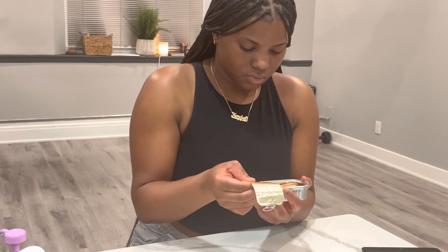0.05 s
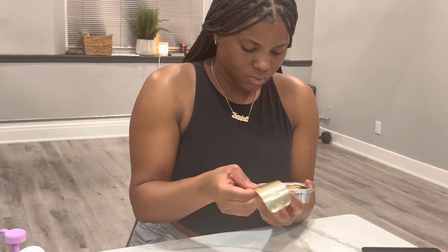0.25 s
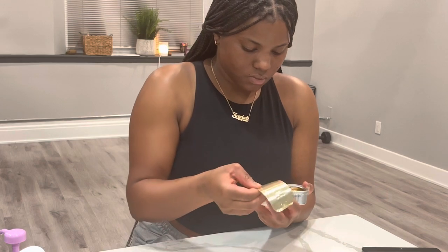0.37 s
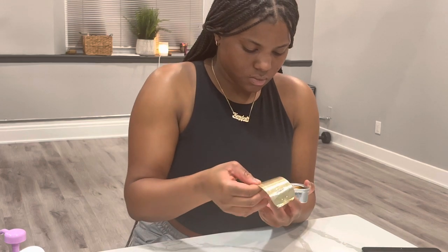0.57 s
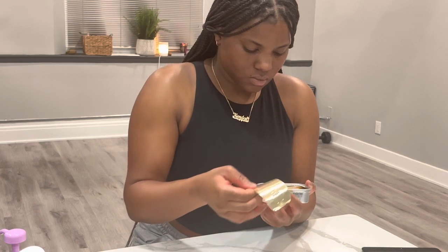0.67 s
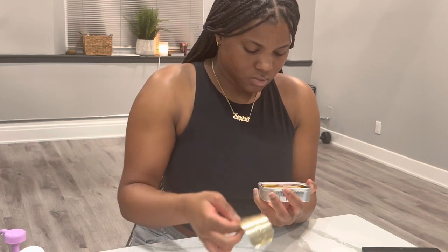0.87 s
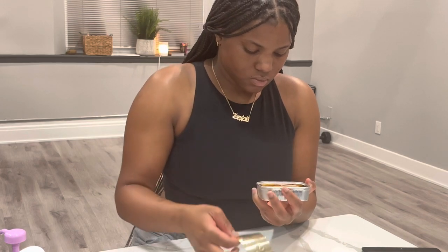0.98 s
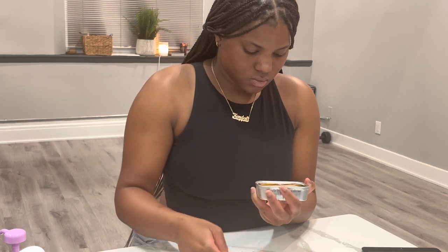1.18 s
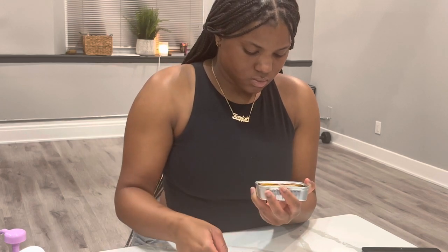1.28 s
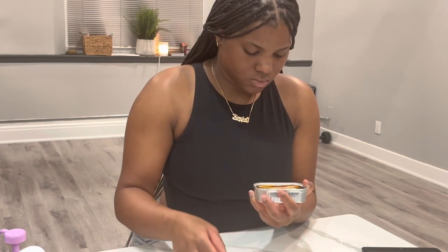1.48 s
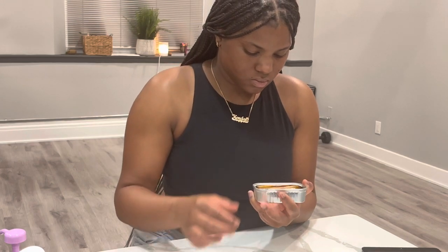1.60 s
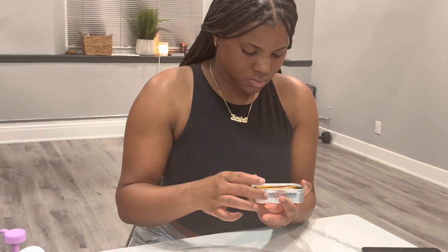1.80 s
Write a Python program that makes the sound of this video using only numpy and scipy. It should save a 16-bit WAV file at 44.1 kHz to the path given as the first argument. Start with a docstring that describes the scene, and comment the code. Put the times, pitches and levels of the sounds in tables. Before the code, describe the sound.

A metal lid peels off a small tin with faint cracks, then tears free at about 0.25 seconds with one sharp, briefly ringing snap. Around 1 second a table is softly bumped twice. From 1.1 to 1.4 seconds the thin lid ticks, rattles and settles with two light knocks. Another soft bump comes at 1.7 seconds. The bare room echoes, with a low, wavering hum throughout.

```python
"""A bare, echoing room holds quiet noise and a low, wavering hum from start to end.
First come the last faint cracks of a lid being peeled off a small tin. A quarter second in, the
last strip of metal tears with one sharp snap, and the tin and lid ring as they spring apart.
At about one second the table is softly bumped twice. The thin lid then ticks and rattles onto it
and settles with two light knocks. One more soft bump follows as the echo fades."""
import sys
import numpy as np
from scipy import signal
from scipy.fft import rfft, irfft, next_fast_len
from scipy.io import wavfile

SR = 44100
rng = np.random.default_rng(int(sys.argv[2]) if len(sys.argv) > 2 else 0)


def output_pcm(signal):
    """Save a mono or channel-first signal as 16-bit PCM at the path in sys.argv[1].

    Samples are clipped to [-1, 1] before scaling.
    """
    pcm = np.clip(np.atleast_2d(signal).T, -1, 1) * 32767
    wavfile.write(sys.argv[1], SR, np.round(pcm).astype(np.int16))


N = 81585
LEAD_IN = SR // 10  # extra samples before time zero, so an earlier sound can leave its echo
LENGTH = LEAD_IN + N
HIT_TIME_S = np.arange(SR // 2) / SR

# A "colour" says how strong each pitch is next to the others; fade_s is the time to fall by 60 dB.
# colour of the room noise: pitch_hz, level_db
ROOM_NOISE_COLOUR = [(20, -19.5), (40, -10), (56, 0), (80, -5), (110, -1.5), (135, -5), (170, -5),
                     (230, -7), (320, -12), (430, -8), (700, -13.5), (1500, -16.5), (2500, -30),
                     (4500, -37), (7000, -56), (10000, -58.5), (16000, -66.5)]
# how loud the hum is: time_s, level_db
HUM_LEVELS = [(0, -41.5), (.05, -49.5), (.12, -54), (.19, -53.5), (.3, -50.5), (.4, -48.5), (.55, -44),
              (.74, -46.5), (.8, -51), (.87, -58.5), (1.0, -52.5), (1.08, -49.5), (1.18, -74),
              (1.24, -47.5), (1.42, -51.5), (1.53, -45.5), (1.66, -64.5), (1.85, -55.5)]
# how the hum drifts in pitch: time_s, pitch_hz
HUM_PITCHES = [(0, 110.3), (.4, 107.5), (.8, 107.5), (1.1, 108.5), (1.26, 112.1), (1.55, 113.8),
               (1.85, 116.2)]

# cracks of the peeling, the first heard only as its echo: start_s, relative_level_db
CRACKS = [(-0.03, -3), (0.003, -14), (0.011, -19)]
# colour of a crack: pitch_hz, level_db
CRACK_COLOUR = [(300, -15.5), (1500, -14.5), (2600, 0), (4200, -7), (6000, -11), (9000, -8.5),
                (13000, -6.5), (16000, 0)]
# how long the room echoes: pitch_hz, fade_s
ECHO_FADES = [(200, 1.7), (800, 1.15), (2000, 1.25), (5000, 1.07), (8000, 0.72), (11000, 0.5),
              (13500, 1.53), (16000, 0)]
# colour of the echo: pitch_hz, level_db
ECHO_COLOUR = [(200, -12), (400, -12.5), (700, -7.5), (1200, -7), (1600, 5), (2000, -3), (2700, -7),
               (3300, -7.5), (5000, -1.5), (7000, -4), (10500, -5), (14500, -16)]
# colour of tearing metal: pitch_hz, level_db
TEAR_COLOUR = [(280, -35.5), (420, -10), (850, 1.5), (1200, -9), (2200, -3), (3400, -0.5), (4400, -7),
               (5200, -7), (7500, -11.5), (11000, -8), (14700, -6.5), (16000, -7.5)]
# tones of the tin and lid springing apart: pitch_hz, level_db, fade_s
TIN_TONES = [(394, -24.5, 0.041), (489.7, -19, 0.023), (655, -16.5, .016), (950, -22, 0.015),
             (1488, -29, 0.033), (1525, -44.5, 0.65), (1580, -47, 0.18), (1789, -50.5, 0.8),
             (2202, -28, .025), (2500, -26.5, .025), (2997, -26, 0.032), (3300, -20.5, .02),
             (4306, -26.5, 0.031), (5160, -27, 0.017), (6850, -27, 0.032), (11100, -31, 0.021)]

# soft bumps on the table: start_s, level_db
TABLE_BUMPS = [(1.025, -44), (1.076, -40), (1.698, -42)]
# tones of the bumped table: pitch_hz, relative_level_db, fade_s
TABLE_TONES = [(62, -8, 0.17), (87.1, 3.5, 0.11), (119, 2, 0.13), (169, -7, 0.081)]
# the lid touches the table:
# start_s, ring_db, low_boost_db, high_boost_db, knock_db, scratch_db, pitch_factor
LID_TAPS = [(1.1269, -32.5, -6, -3.5, -77, -42.5, .985), (1.1537, -51, 14, 12, -67, -51, 1.06),
            (1.1557, -65, 5, 3, -65, -48, 1.06), (1.2206, -29.5, 2.5, -4.5, -72, -35.5, 1.0),
            (1.2469, -38.5, 0.5, -2.5, -51, -48, 1.0), (1.2655, -42, -1, -13, -79, -51, 0.9),
            (1.3311, -43, 11, 1, -35, -42, 1.025), (1.352, -44, 13, -5, -42, -57, 1.01),
            (1.3558, -47, 3.5, -12, -42, -56, 1.0), (1.3661, -55.5, 13.5, -13, -77, -70, 1.0)]
# tones of the loose lid: pitch_hz, relative_level_db, fade_s
LID_TONES = [(1622, -13.5, 0.021), (2210, -17, 0.028), (2626, -6, .026), (2806, -2.5, 0.028),
             (3300, -17, 0.013), (3950, 2, 0.0089), (4265, -2, 0.016), (7130, -6, 0.019), (8450, -9, 0.01),
             (10280, -1, 0.014), (12400, -5, .01), (13000, 1.5, 0.014), (15100, -4, .01)]
# colour of the lid scratching the table: pitch_hz, level_db
SCRATCH_COLOUR = [(1500, -25), (3000, -15), (4300, -19), (5500, -10), (8000, 7), (10500, 2), (14500, 8.5),
                  (16000, -14)]
# colour of a knock on the table top: pitch_hz, level_db
KNOCK_COLOUR = [(200, -24), (450, 3), (800, -4.5), (1250, 1.5), (1700, -13), (2300, -0.5), (5500, -14.5),
                (9000, -15.5)]

# how alike left and right are for sound from all around (1 = the same): pitch_hz, likeness
ROOM_LIKENESS = [(30, 1), (100, 0.74), (250, 1), (500, .3), (900, -0.28), (1500, -0.2), (2000, 0.88),
                 (4800, 0.84), (6000, 1), (15000, 0.99)]
# the same for sound that arrives straight from its source: pitch_hz, likeness
STRAIGHT_LIKENESS = [(300, 0.97), (4000, .96), (7000, 1), (15000, .72)]
# how far the left microphone opening is ahead of the right: pitch_hz, lead_radians
LEFT_LEAD = [(0, 0), (1800, .05), (3400, .6), (5000, 0), (5800, -1), (6700, -1.1), (8300, -3.14),
             (10500, -5), (11300, -6.2), (12800, -6.4), (15500, -9.4)]

# a burst of crackle sags while it holds, then fades
TEAR_SHAPE = dict(hold_s=0.0034, sag_db_per_s=1303, fade_s=0.012)
TAP_SHAPE = dict(hold_s=0.0035, sag_db_per_s=598)


def from_db(db):
    """Turns decibels into a number to multiply by."""
    return 10 ** (np.asarray(db) / 20)


def fade(t, fade_s):
    """A curve that falls by 60 dB every fade_s seconds."""
    return np.exp(-np.log(1000) * t / fade_s)


def at_pitch(table, hz):
    """Reads between the rows of a table, with octaves evenly spaced."""
    pitches, values = np.transpose(table)
    return np.interp(np.log(np.maximum(hz, 1)), np.log(pitches), values)


def add(track, start_s, sound):
    """Mixes a sound into a track at the given time."""
    start = max(LEAD_IN + int(start_s * SR), 0)
    part = sound[..., :LENGTH - start]
    track[:, start:start + part.shape[-1]] += part


def noise(size, likeness, colour=None):
    """Stereo noise of strength 1 with a given left-right likeness and colour."""
    hz = np.fft.rfftfreq(size, 1 / SR)
    shared, opposed = rfft(rng.standard_normal((2, size)))
    alike = np.clip(at_pitch(likeness, hz), -1, 1)
    spectrum = np.sqrt(1 + alike) * shared + np.sqrt(1 - alike) * opposed * [[1], [-1]]
    if colour:
        spectrum *= from_db(at_pitch(colour, hz))
    sound = irfft(spectrum, size)
    return sound / sound.std()


def crackle(colour, hold_s, sag_db_per_s, fade_s):
    """A tiny burst of dense crackle: it starts at once, sags, then quickly fades."""
    sag = from_db(-sag_db_per_s * np.minimum(HIT_TIME_S, hold_s))
    release = fade(np.maximum(HIT_TIME_S - hold_s, 0), fade_s)
    return sag * release * noise(len(HIT_TIME_S), STRAIGHT_LIKENESS, colour)


def ring(tones, spread_s=0.000856, rise_cycles=1.2):
    """A struck object rings: bending waves start each of its tones within spread_s."""
    out = 0
    for (hz, db, fade_s), delay_s in zip(tones, spread_s * rng.random(len(tones))):
        t = np.maximum(HIT_TIME_S - delay_s, 0)
        swell = 1 - np.exp(-t * hz / rise_cycles)  # low tones bloom later
        out = out + from_db(db) * swell * fade(t, fade_s) * np.sin(2 * np.pi * hz * t)
    return out


def room_noise(level_db=-51):
    """A quiet, steady rumble from all around."""
    return from_db(level_db) * noise(LENGTH, ROOM_LIKENESS, ROOM_NOISE_COLOUR)


def hum(octave_db=-16):
    """A low tone with a faint one an octave above; its level and pitch waver."""
    t = (np.arange(LENGTH) - LEAD_IN) / SR
    pitch_hz = np.interp(t, *np.transpose(HUM_PITCHES))
    level_db = np.interp(t, *np.transpose(HUM_LEVELS))
    phase = 2 * np.pi * np.cumsum(pitch_hz) / SR
    return np.sqrt(2) * from_db(level_db) * (np.sin(phase) + from_db(octave_db) * np.sin(2 * phase))


def peel_cracks(level_db=-21):
    """The scored seam around the lid cracks as it is peeled."""
    out = np.zeros((2, LENGTH))
    for start_s, db in CRACKS:
        add(out, start_s, from_db(level_db + db) * crackle(CRACK_COLOUR, **TEAR_SHAPE))
    return out


def room_echo(sound, first_echo_s=0.0065, early_db=-3, early_s=0.019):
    """Dense echoes off bare walls, stronger at first; each band of pitches fades at its own speed."""
    t, hz = np.arange(SR) / SR, np.fft.rfftfreq(SR, 1 / SR)
    spectrum = rfft(noise(SR, ROOM_LIKENESS)) * from_db(at_pitch(ECHO_COLOUR, hz))
    edges_hz = np.geomspace(100, 18000, 17)
    echoes = 0
    for low, high in zip(edges_hz, edges_hz[1:]):
        band = irfft(spectrum * ((hz >= low) & (hz < high)), SR)
        tail = fade(t, at_pitch(ECHO_FADES, np.sqrt(low * high)))
        echoes = echoes + band * tail / np.linalg.norm(tail)
    early_boost = 1 + from_db(early_db) * np.exp(-t / early_s)
    echoes = echoes * early_boost * (t > first_echo_s)
    return signal.fftconvolve(sound.mean(0)[None], echoes, axes=1)[:, :LENGTH]


def snap(ring_gain, start_s=0.2395, tear_db=-15):
    """The last strip of metal tears, and the tin and lid ring."""
    out = np.zeros((2, LENGTH))
    tear = from_db(tear_db) * crackle(TEAR_COLOUR, **TEAR_SHAPE)
    add(out, start_s, tear + ring_gain * ring(TIN_TONES))
    return out


def table_bumps():
    """The table gives dull, faint thuds, probably under a forearm."""
    out = np.zeros((2, LENGTH))
    for start_s, db in TABLE_BUMPS:
        add(out, start_s, from_db(db) * ring(TABLE_TONES))
    return out


def lid_rattle(ring_gain, low_below_hz=3500, high_above_hz=6000):
    """Each touch rings the lid and scratches the table; flat landings also knock the table top."""
    out = np.zeros((2, LENGTH))
    for start_s, ring_db, low_boost_db, high_boost_db, knock_db, scratch_db, pitch_factor in LID_TAPS:
        tones = []
        for hz, tone_db, fade_s in LID_TONES:
            boost_db = low_boost_db * (hz < low_below_hz) + high_boost_db * (hz > high_above_hz)
            tones.append((hz * pitch_factor, ring_db + tone_db + boost_db, fade_s))
        ringing = ring_gain * ring(tones)
        scratch = from_db(scratch_db) * crackle(SCRATCH_COLOUR, **TAP_SHAPE, fade_s=0.02)
        knock = from_db(knock_db) * crackle(KNOCK_COLOUR, **TAP_SHAPE, fade_s=0.022)
        add(out, start_s, ringing + scratch + knock)
    return out


def metal_sounds(ring_gain):
    """What the tin and lid send out in one direction; every direction sounds a little different."""
    return snap(ring_gain) + peel_cracks() + lid_rattle(ring_gain)


def scene(directions=3):
    """The background, the tin and lid, their echoes blended from several directions, and the bumps."""
    background = room_noise() + hum()
    straight = metal_sounds(ring_gain=1)
    # the walls get a little less ring than the microphone does
    echoes = sum(room_echo(metal_sounds(ring_gain=from_db(-1))) for _ in range(directions))
    mix = background + straight + echoes / np.sqrt(directions) + table_bumps()
    return mix[:, LEAD_IN:]


def record(dry, cutoff_hz=15700):
    """The microphone's two openings hear high pitches out of step; the very highest are cut."""
    size = next_fast_len(LENGTH)
    lead_radians = np.interp(np.fft.rfftfreq(size, 1 / SR), *np.transpose(LEFT_LEAD))
    shift = np.exp(0.5j * lead_radians * [[1], [-1]])  # half to each side, in opposite directions
    stereo = irfft(rfft(dry, size) * shift, size)[:, :N]
    low_pass = signal.ellip(10, 0.2, 80, cutoff_hz, fs=SR, output="sos")
    return signal.sosfilt(low_pass, stereo)


dry = scene()
out = record(dry)
output_pcm(out)
```